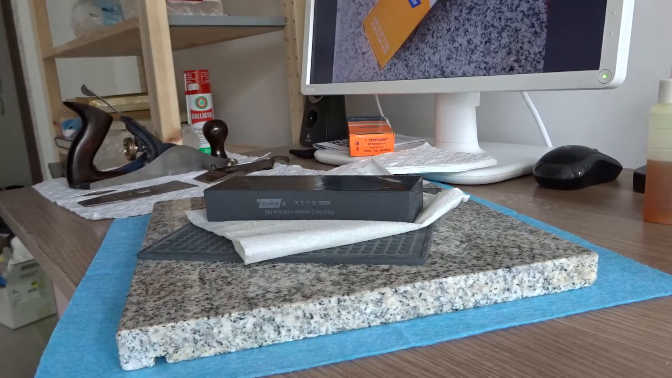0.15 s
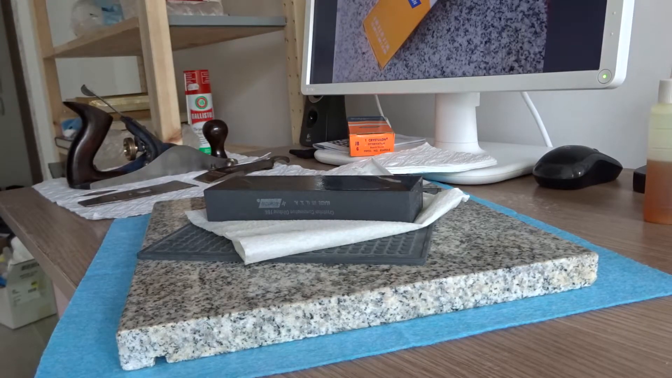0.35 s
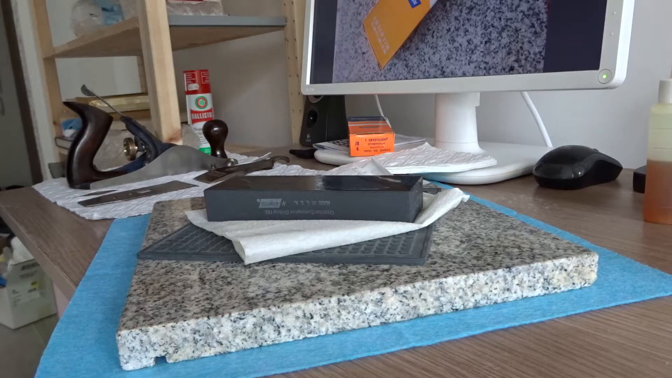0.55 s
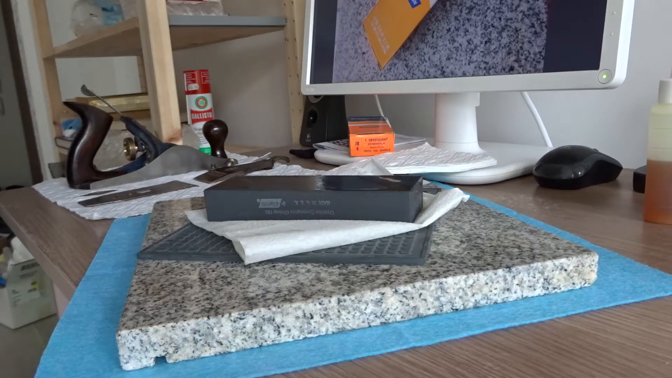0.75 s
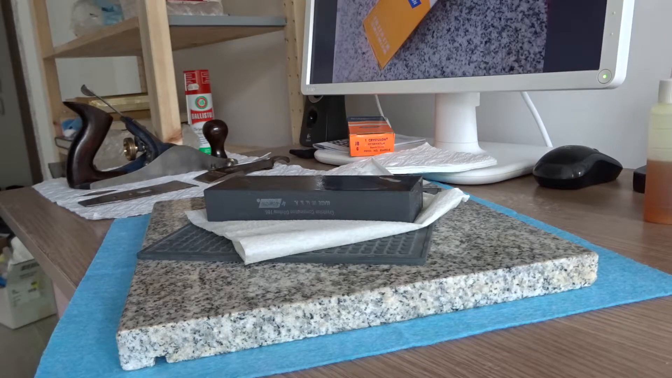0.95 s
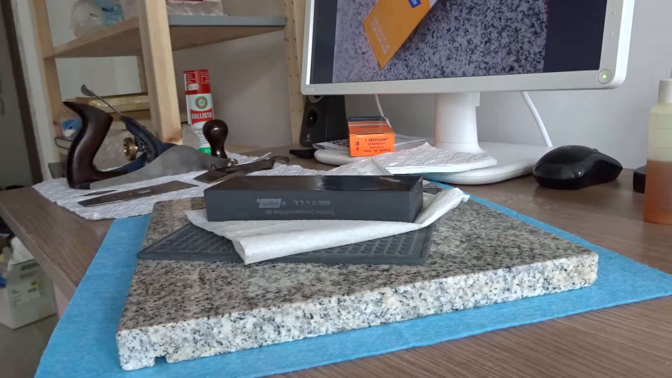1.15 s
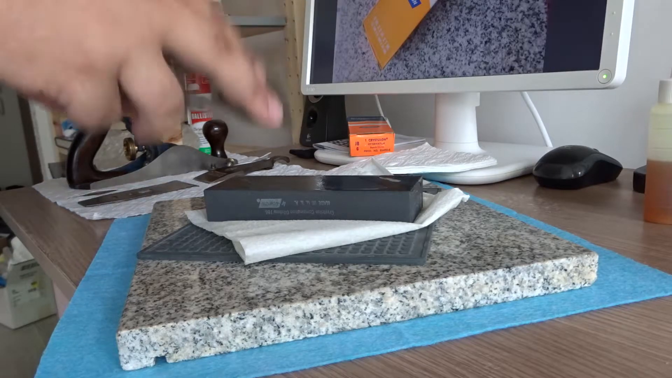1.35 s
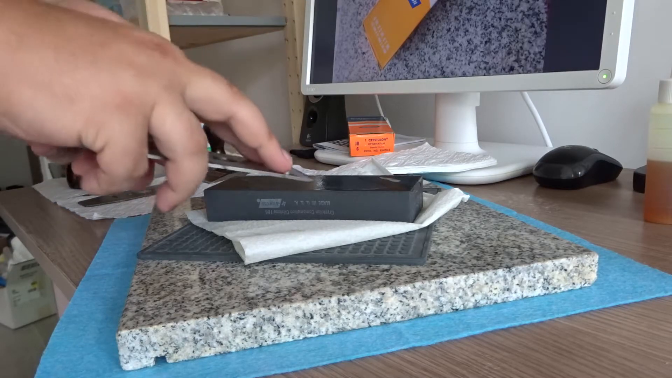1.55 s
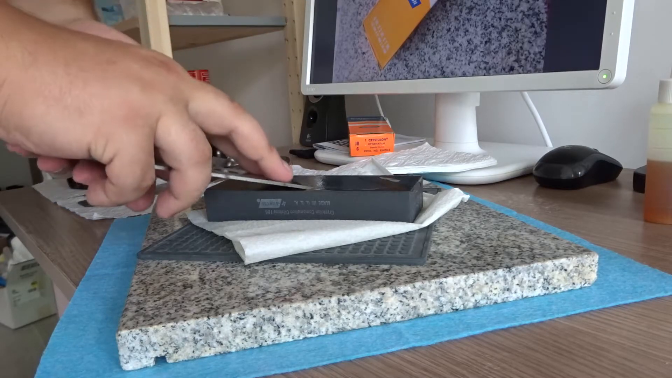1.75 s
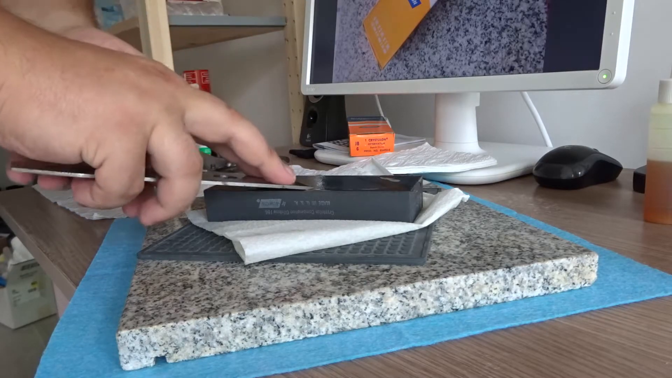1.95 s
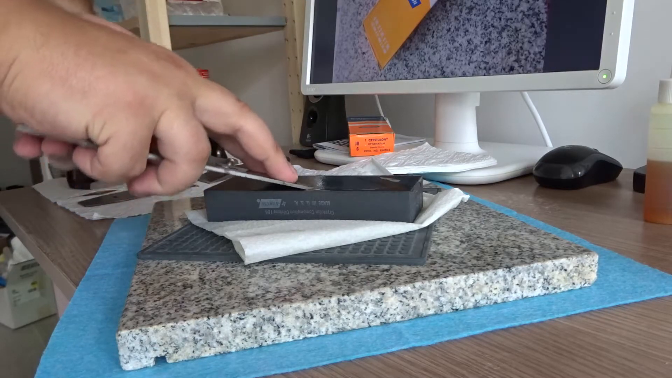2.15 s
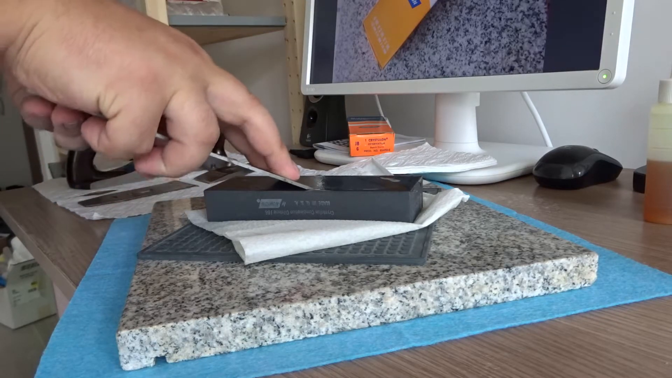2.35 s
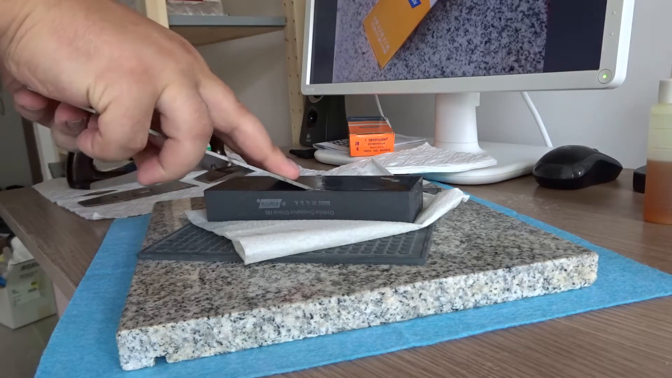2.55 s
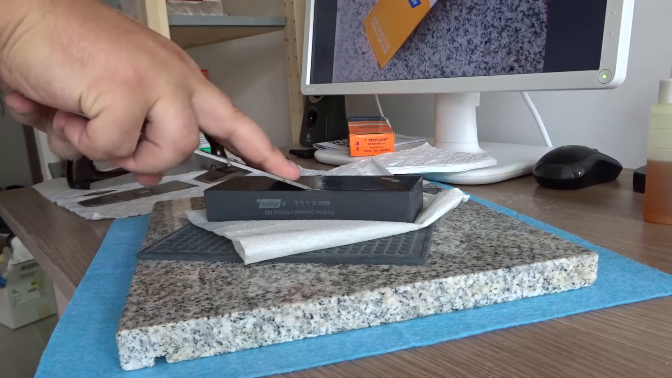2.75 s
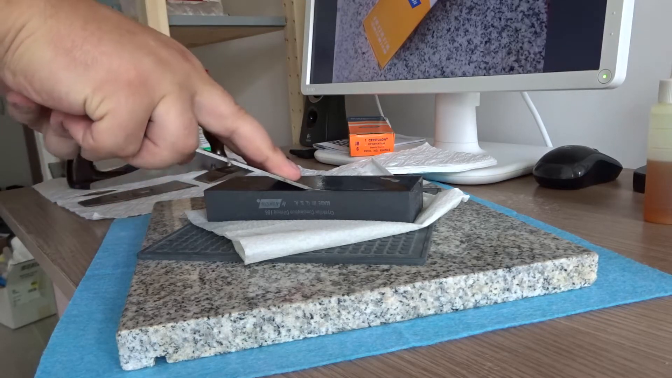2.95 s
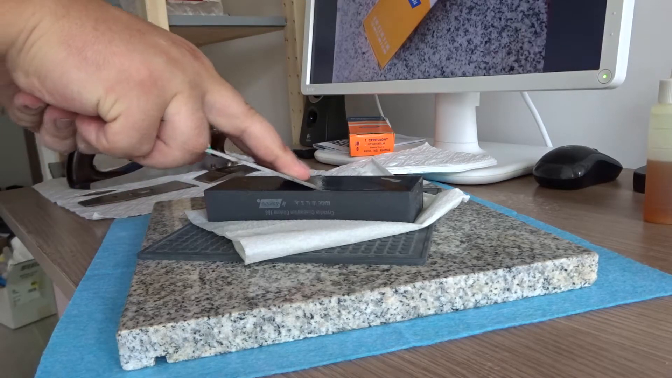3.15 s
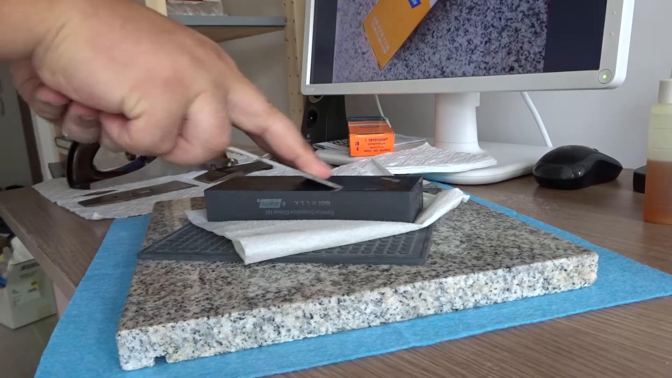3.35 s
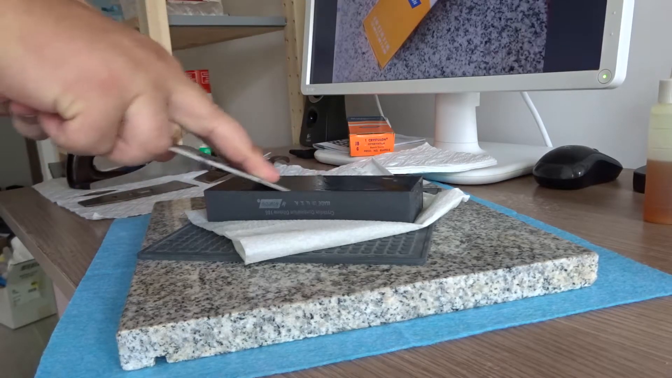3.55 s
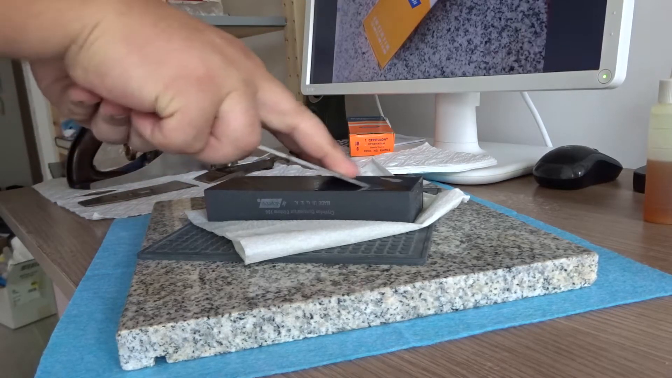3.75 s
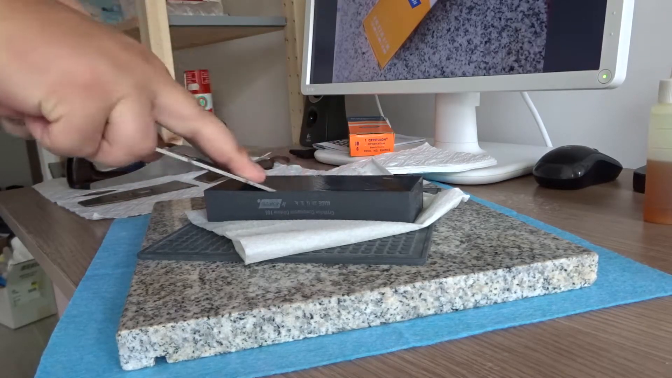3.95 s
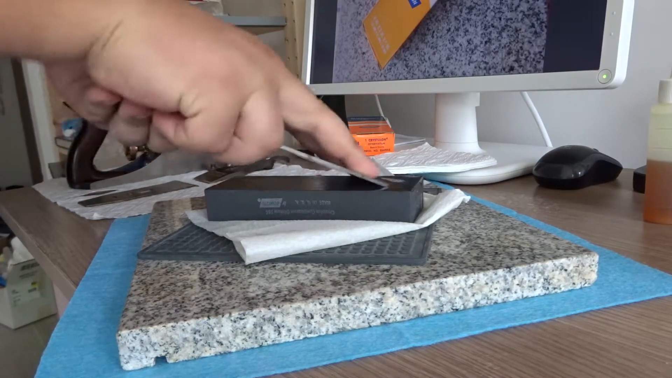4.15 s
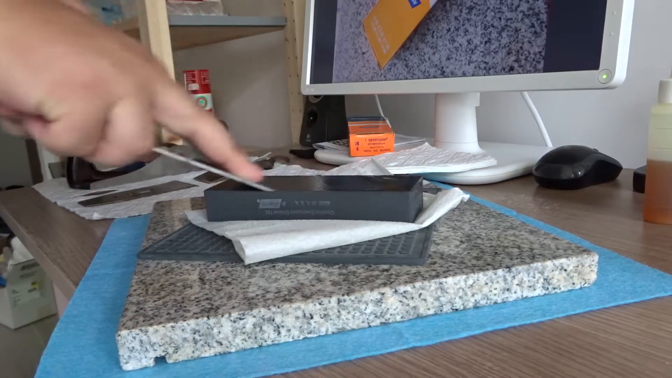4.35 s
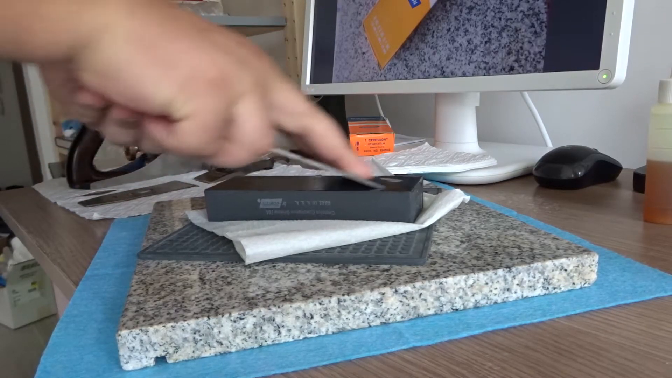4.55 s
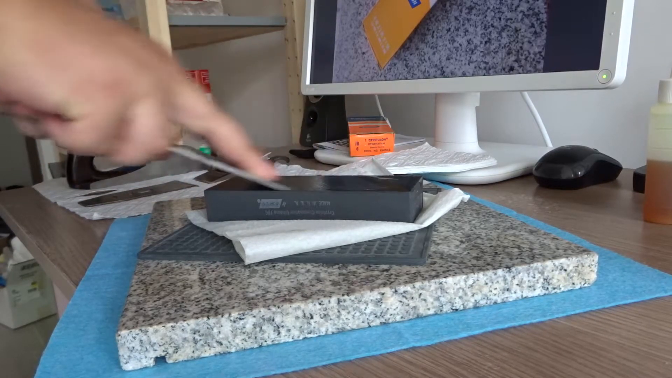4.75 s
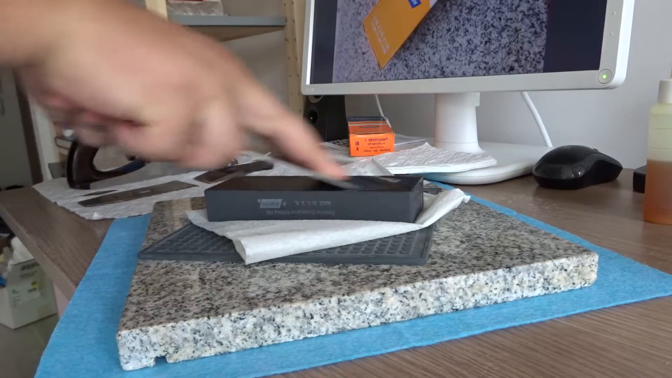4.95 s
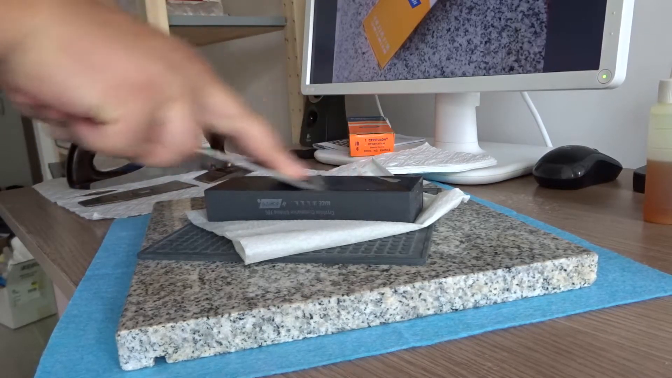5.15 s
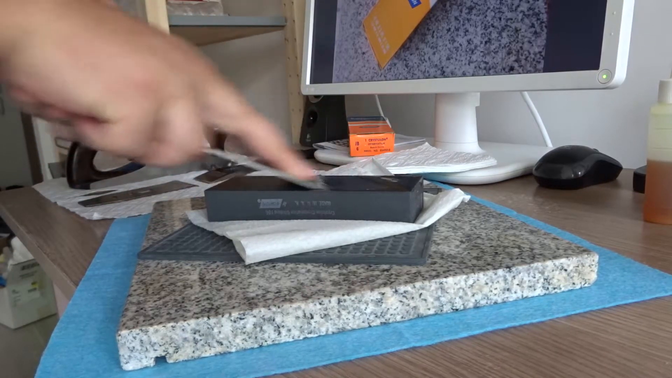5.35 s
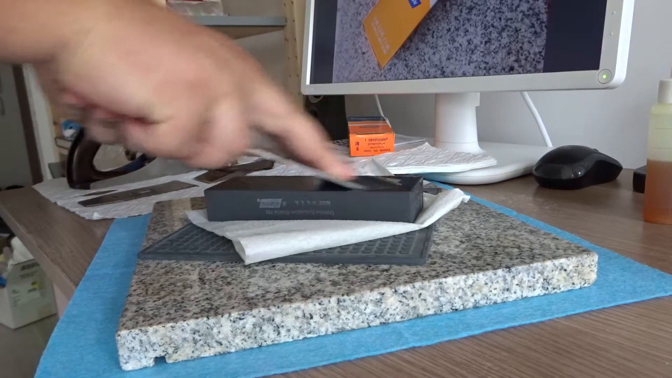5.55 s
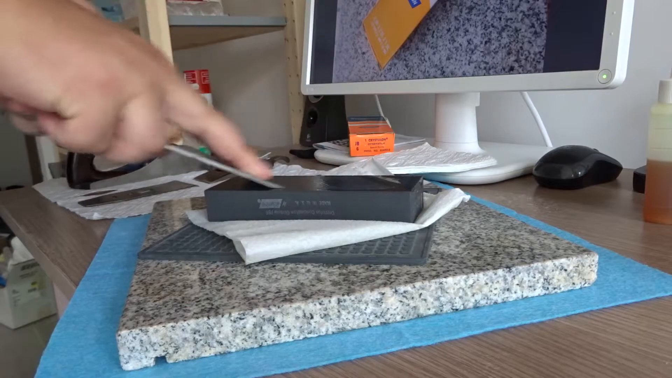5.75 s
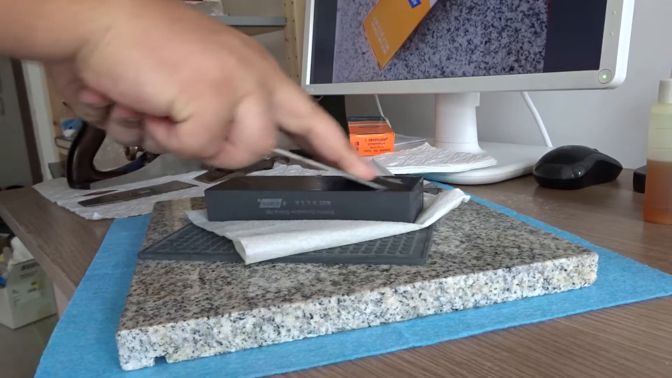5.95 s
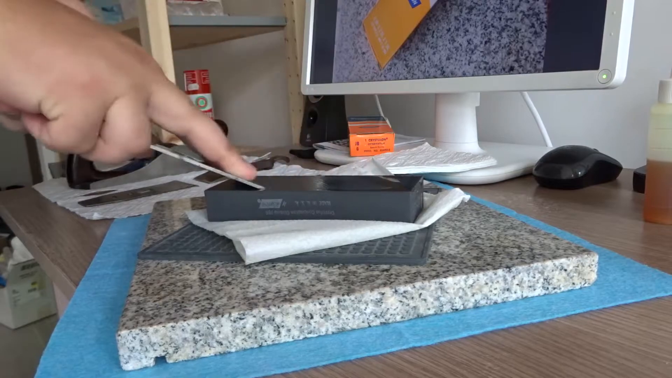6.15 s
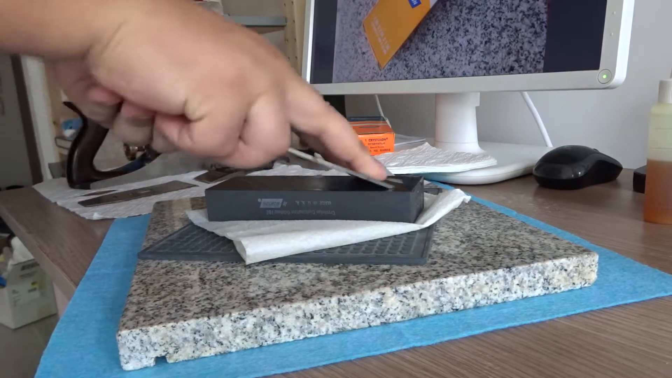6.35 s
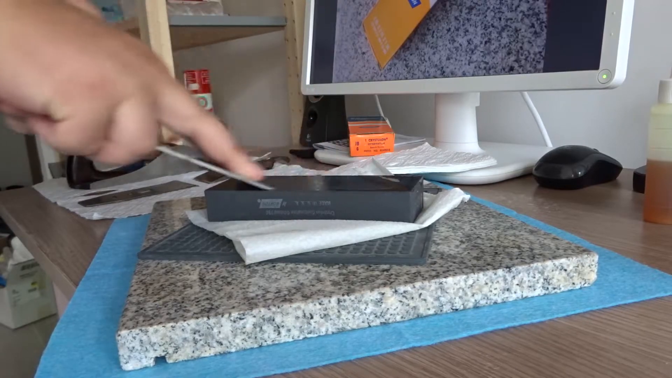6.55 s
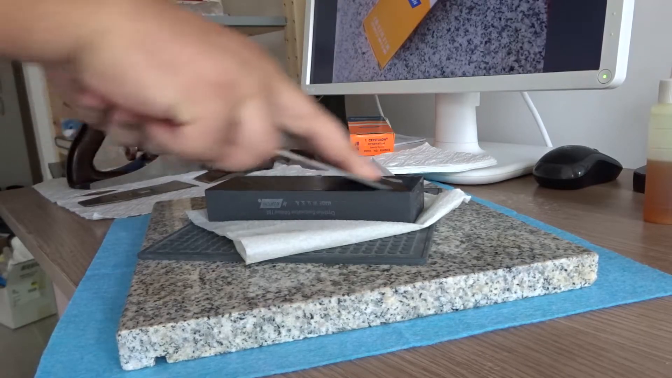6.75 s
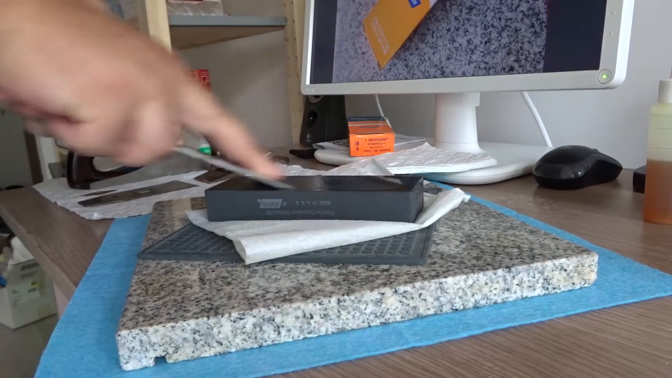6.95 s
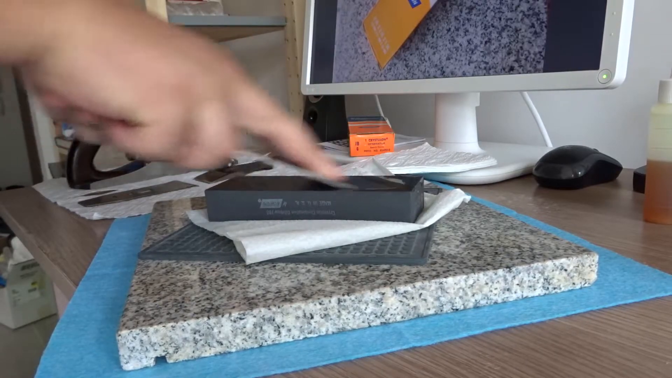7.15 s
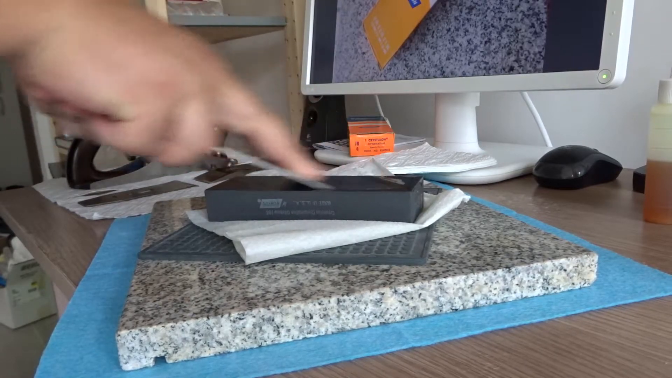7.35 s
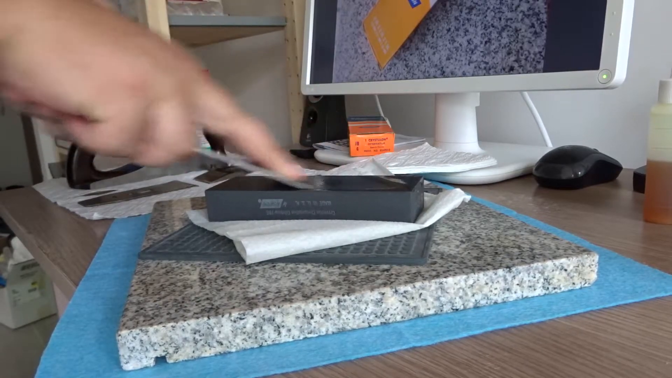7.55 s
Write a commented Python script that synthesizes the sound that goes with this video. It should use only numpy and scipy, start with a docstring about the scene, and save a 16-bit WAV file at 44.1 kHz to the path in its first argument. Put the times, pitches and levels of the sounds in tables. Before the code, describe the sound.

In a small, quiet room a clock ticks faintly over a low hum. Hands bump a desk, and a steel plane blade lands on an oiled whetstone, skids, then slides and clicks as it is settled. Sharpening follows close by: quick, even back-and-forth strokes with a bright, gritty rasp and a slight metallic ring, while the desk rumbles and thumps softly underneath.

```python
"""A small, quiet room: low noise, mains hum and a faint ringing tick about once a second, as of a clock.
Hands bump the desk. Near 1.8 s a plane iron (the blade of a wood plane) lands on an oiled whetstone
and skids, then slides and clicks as it is rocked until its bevel, the sloping edge, lies flat.
From about 3.1 s it is sharpened in quick strokes: grit rasps the steel and makes it bend and ring,
while the hands rumble the desk."""
import sys
import numpy as np
from scipy import signal
from scipy.fft import rfft, irfft, next_fast_len
from scipy.io import wavfile
from scipy.ndimage import map_coordinates

SR = 44100
rng = np.random.default_rng(int(sys.argv[2]) if len(sys.argv) > 2 else 0)


def store_wav(level_fs):
    """Save 16-bit WAV to argv[1]."""
    pcm = np.round(np.clip(np.atleast_2d(level_fs), -1, 1) * 32767)
    wavfile.write(sys.argv[1], SR, pcm.T.astype(np.int16))


N = 334719
TIME = np.arange(N) / SR
PADDED = next_fast_len(N + SR)
FREQS = np.maximum(np.arange(PADDED // 2 + 1) * SR / PADDED, 1)
HONING_START_S = 3.137

# the blade lands flat on the stone and bounces once: t/s, level/dB
LANDING = [(1.758, -34.5), (1.765, -35)]


def from_db(db):
    """Turn decibels into a factor to multiply by."""
    return 10 ** (np.asarray(db) / 20)


def rms_one(x):
    """Scale a signal so that its average power is 1."""
    return x / np.sqrt(np.mean(x ** 2) + 1e-20)


def shape_db(points, resonances=()):
    """A smooth tone colour with a hump for each resonance, in dB at every frequency."""
    hz, db = np.transpose(points)
    humps = sum(lift / (1 + (2 * (FREQS - centre) / width) ** 2) for centre, width, lift in resonances)
    return np.interp(np.log(FREQS), np.log(hz), db) + humps


def filtered(x, gain):
    """Turn each frequency up or down by its own gain."""
    return irfft(rfft(x, PADDED) * gain, PADDED)[..., :N]


def body(x, db):
    """Colour a sound as an object does, ringing only after it is hit (a minimum-phase filter)."""
    cepstrum = irfft(np.log(rms_one(from_db(db))), PADDED)
    cepstrum[1:PADDED // 2] *= 2
    cepstrum[PADDED // 2 + 1:] = 0
    return filtered(x, np.exp(rfft(cepstrum)))


def drift(hz):
    """A random wobble of typical size 1, mostly slower than hz."""
    return rms_one(filtered(rng.standard_normal(N), 1 / (1 + (FREQS / hz) ** 2)))


def decay(t60, start=0):
    """A level that jumps to 1, then falls by 60 dB in t60 seconds."""
    return (TIME >= start) * from_db(-60 * np.clip((TIME - start) / t60, 0, 2))


def swell(start, rise, hold, t60):
    """A level that rises, holds and dies away; times in seconds."""
    fade = from_db(-60 * np.clip((TIME - start - rise - hold) / t60, 0, 2))
    return np.clip((TIME - start) / rise, 0, 1) * fade


def bursts(times, levels_db, t60):
    """Short crunches of noise, one for each contact."""
    return rng.standard_normal(N) * sum(from_db(db) * decay(t60, s) for s, db in zip(times, levels_db))


def grit(per_s, spread_db):
    """Grains of uneven size catch at random moments."""
    sizes = from_db(spread_db * np.minimum(rng.exponential(1, N), 5)) * rng.choice([-1, 1], N)
    chance = np.clip(per_s / SR, 1e-3, 1)
    return rms_one(sizes * (rng.random(N) < chance) / np.sqrt(chance))


def reflections(x, t60, delay):
    """Dense echoes that die away, about as strong in all as the sound itself."""
    tail = rng.standard_normal(N) * decay(t60, delay)
    return signal.fftconvolve(x, tail / np.linalg.norm(tail))[:N]


def diffuse(mid, side):
    """Sound from all around: left and right are alike in the bass and differ higher up."""
    # stereo width: f/Hz, side level/dB
    width = [(100, -25), (250, -18), (550, -6.5), (1200, -2), (5000, 0), (10000, 1.5), (13000, -7.5)]
    return mid + filtered(side, from_db(shape_db(width))) * np.array([[1], [-1]])


def room(x, wet_db, side_db):
    """Echoes from shelves and walls, different on the left and right."""
    mid, side = [reflections(x, t60=0.34, delay=0.0028) for _ in range(2)]
    return x + from_db(wet_db) * diffuse(mid, from_db(side_db) * side)


def background(air_db=-48.5, waver=0.3):
    """Low room noise with wavering mains hum and a thin electronic whine."""
    # colour of the room noise: f/Hz, level/dB
    air_colour = [(25, -35), (60, -3.5), (110, -6), (180, -2), (250, -1), (400, -9), (620, -9),
                  (850, -14.5), (1150, -22.5), (2700, -26.5), (4400, -32), (5500, -39), (15500, -44)]
    # hum and whine: f/Hz, level/dB
    tones = [(49, -79), (123, -59), (9577, -73)]
    air = diffuse(*body(rng.standard_normal((2, N)), shape_db(air_colour)))
    air *= from_db(air_db + drift(hz=4.2))
    hum = 0
    for hz, db in tones:
        tone = np.sqrt(2) * np.sin(2 * np.pi * hz * TIME + drift(hz=2.8))
        hum += from_db(db) * tone * (1 + waver * drift(hz=6.5))
    return air + hum


def clock(wash_db=-6.5, wash_t60=1.4, swell_db=9.5, wire_db=-5.0, flutter=0.97, click_db=-1.0):
    """Each tick sets ringing a few clear tones and a wash of many weak ones."""
    # ticks: t/s, level/dB
    ticks = [(-.38, -35), (0.687, -44.5), (1.804, -44), (2.874, -46.5)]
    # tones of the clock's wire: f/Hz, level/dB, t60/s
    wire = [(2536, -11, 1.5), (3499, 1.5, 1.15), (4371, 1, 1.5), (7009, -12, 1.2), (7542, -10, 1.2),
            (8032, -14, .9), (10860, -10, .7), (11480, -16, .55), (12710, 0, .55), (14800, -13, .4)]
    # colour of the wash: f/Hz, level/dB
    colour = [(1500, -1), (2500, 10.5), (3000, 3), (5000, 9), (5800, 1), (7200, 5.5), (8800, -4),
              (11000, 3.5), (14000, -12), (15500, 5.5)]
    # where its tones bunch up: f/Hz, width/Hz, lift/dB
    clusters = [(3574, 96, 21.8), (4100, 110, 4.9), (12700, 350, 11)]
    level = 0
    for s, db in ticks:
        spread = np.clip((TIME - s) / 0.14, 0, 1)   # the ringing spreads through the case
        level += from_db(db + wash_db + swell_db * spread) * decay(wash_t60, s)
        level += from_db(db + click_db) * decay(0.088, s)   # the blow itself
    shimmer = rng.standard_normal(N)
    shimmer = 0.54 * (shimmer + reflections(shimmer, t60=0.026, delay=0.00082))
    sound = level * body(shimmer, shape_db(colour, clusters))
    for hz, tone_db, t60 in wire:
        ringing = sum(from_db(db + tone_db + wire_db) * decay(t60, s) for s, db in ticks)
        beating = 1 + flutter * (drift(hz=23) + 1j * drift(hz=110))   # close tones flutter together
        sound += ringing * np.real(beating * np.exp(2j * np.pi * hz * TIME))
    return sound


def desk(light_db=-12.0, thump_db=-8.0, rumble_db=-47.5, waver_db=1.8, lean_s=0.08):
    """Hands bump the desk lightly; once they lean on the stone it thumps deeper and rumbles."""
    # thumps of the hands: t/s, level/dB
    thumps = [(0.408, -49), (1.583, -22.5), (1.653, -24), (1.732, -23), (2.427, -27), (2.77, -27),
              (3.281, -26), (3.551, -21), (3.707, -22.5), (5.999, -21), (6.164, -20), (6.391, -23),
              (7.551, -24.5)]
    # the desk's resonances: f/Hz, width/Hz, lift/dB
    resonances = [(128.8, 12, 16), (190.5, 52, 19), (248, 25, 12.5)]
    s, db = np.transpose(thumps)
    leaning = s > HONING_START_S
    working = np.clip((TIME - HONING_START_S) / lean_s, 0, 1)
    rumble = working * from_db(rumble_db + waver_db * drift(hz=3.9)) * rng.standard_normal(N)
    heavy = rumble + bursts(s[leaning], db[leaning] + thump_db, t60=0.084)
    light = bursts(s[~leaning], db[~leaning] + light_db, t60=0.12)
    # colours of heavy and light shaking: f/Hz, level/dB
    deep = [(30, -10), (80, -0.5), (250, 1), (450, -6.0), (1200, -20), (5000, -85)]
    higher = [(60, -45), (150, -5), (200, 0.5), (270, 4), (350, -22.5), (1200, -28), (5000, -72)]
    return body(heavy, shape_db(deep, resonances)) + body(light, shape_db(higher))


def knock(knock_db=-19):
    """The landing blade makes the stone ring briefly."""
    # the stone's tones: f/Hz, level/dB, t60/s
    tones = [(1180, -14, 0.26), (1740, -18, .12), (2090, -15, .12), (3250, 12, 0.031), (4170, 5, 0.061),
             (5350, 1, 0.044)]
    ring = sum(from_db(db) * decay(t60) * np.sin(2 * np.pi * hz * TIME) for hz, db, t60 in tones)
    s, db = np.transpose(LANDING)
    return signal.fftconvolve(bursts(s, db + knock_db, t60=0.0073), ring)[:N]


def skid(skid_db=-45, scuff_db=-3.0):
    """The loose blade scuffs as it lands, then skids over the grit, ringing."""
    # colour of the skid: f/Hz, level/dB
    colour = [(500, -20), (1100, -1.5), (2500, -2), (5200, 7.5), (6300, 2.5), (8500, 2), (10000, -4),
              (15500, -6)]
    s, db = np.transpose(LANDING)
    level = from_db(skid_db) * swell(s[0], rise=0.036, hold=0.12, t60=0.98)
    scrape = level * grit(20000, spread_db=1.5) + bursts(s, db + scuff_db, t60=0.045)
    ringing = 0.7 * (scrape + reflections(scrape, t60=0.024, delay=0.00083))
    return body(ringing, shape_db(colour))


def loose_blade(force):
    """The loosely held steel rings brightly when tapped or rubbed."""
    # its colour: f/Hz, level/dB
    colour = [(600, -14), (2000, -9), (3500, -3), (7000, 3.5), (11000, 7.5), (15500, 1.5)]
    # its resonances: f/Hz, width/Hz, lift/dB
    resonances = [(2780, 300, 18), (4060, 360, 15), (5740, 270, 12), (6350, 230, 9.1), (7800, 150, 2.8)]
    return body(force, shape_db(colour, resonances))


def clicks(touch_db=-1.0, crack_db=-4.0):
    """The blade clicks on the stone as it lands, as it rocks onto its bevel, and as its edge catches on the
    first push."""
    # the bevel touches down, then the edge catches as the first push begins (3.367 s): t/s, level/dB
    touches = [(2.138, -33), (2.165, -27), (2.405, -31), (2.4276, -29.5), (2.442, -26), (2.721, -32.5),
               (2.774, -25), (3.367, -23)]
    s, db = np.transpose(LANDING + touches)
    return loose_blade(bursts(s, db + touch_db, t60=0.021) + bursts(s, db + crack_db, t60=0.0048))


def slides(patchy_db=2.5):
    """The blade slips lightly over the grit while its bevel is laid flat."""
    # slips: t/s, rise/s, level/dB
    slips = [(2.08, 0.027, -49.5), (2.17, .09, -47), (2.38, 0.039, -49.5), (2.715, 0.018, -48.5),
             (2.75, .04, -60), (2.85, 0.15, -54.5)]
    level = sum(from_db(db) * swell(s, rise, hold=0, t60=0.94) for s, rise, db in slips)
    return loose_blade(level * from_db(patchy_db * drift(hz=68)) * grit(12000, spread_db=4.0))


def stroke_starts(count=24, cycle_s=0.429, slowing_s=0.00095, push_share=0.512):
    """Pulls and pushes take turns in a rhythm that slows very slightly; a cycle is one of each."""
    k = np.arange(count)
    lengths = (cycle_s + slowing_s * k) * np.where(k % 2, push_share, 1 - push_share)
    return HONING_START_S + np.cumsum(lengths) - lengths


def hand(warm_up_s=0.9, cold_db=-2, trial_db=-7, trial_rise_s=0.18, trial_end_s=3.365):
    """After a light trial stroke the hand finds its swing: a pull eases in, a push bites at once."""
    # pull, then push: sharpness of start, sharpness of stop, level/dB, swell along the stroke/dB
    directions = [(3.0, 3.2, -19.5, -.8), (10.0, 3.0, -20, 1)]
    starts = stroke_starts()
    strokes_done = np.interp(TIME, starts, np.arange(len(starts)))
    stroke, part = np.divmod(strokes_done, 1)
    attack, brake, level_db, swell_db = np.array(directions)[stroke.astype(int) % 2].T
    cold = np.exp(-np.maximum(TIME - HONING_START_S, 0) / warm_up_s)   # 1 at first, 0 in full swing
    swing = np.tanh(attack * part) * np.tanh(brake * (1 - part))
    turning_speed = 0.063 * cold + 0.31 * (1 - cold)
    speed = np.hypot(swing, turning_speed)
    contact = np.clip((TIME - HONING_START_S) / trial_rise_s + 0.5, 1e-6, 1)
    press_db = level_db + swell_db * (part - 0.5) + cold_db * cold + trial_db * (TIME < trial_end_s)
    return strokes_done, speed, press_db + 20 * np.log10(contact), cold


def bent(x, strokes_done, bend):
    """Pitch swings by the fraction bend as the blade travels along the stone and back."""
    lag = np.cumsum(bend * np.cos(np.pi * strokes_done) * (strokes_done > 0))
    return map_coordinates(x, [np.arange(N) - lag], order=5)


def honing(grains_per_s=20000, chatter_db=0.52, ring_db=-6.0, roving_hz=5490, roving_width_hz=510):
    """Grit rasps the steel: a faster blade catches more grains and sounds louder and brighter."""
    # the treble needs speed: f/Hz, power of speed that the strength follows
    speed_law = [(1500, 0.32), (4000, 0.36), (9500, 0.6), (13000, 1)]
    # colour of the rasp: f/Hz, level/dB
    colour = [(450, -27.5), (750, -14.5), (1000, -22), (1850, -14.5), (2300, -4), (3100, -6), (4500, -1.5),
              (6100, -0.1), (8500, 0.5), (12000, -0.23), (14000, -3), (15600, -3.5)]
    # resonances of the blade held on the stone: f/Hz, width/Hz, lift/dB
    resonances = [(1474, 280, 13), (1623, 46, 7.5), (2467, 55, 7.5), (2560, 95, 7), (2715, 35, 8.5),
                  (3625, 225, 6.5), (3860, 230, 7.5), (4037, 59, 7.5), (4840, 440, 1), (4980, 130, 5.5),
                  (5450, 250, 7.5), (5445, 140, 2.5), (7500, 61, 5), (8960, 450, 3.5), (10730, 160, 2.5),
                  (12800, 700, 4), (13090, 610, 6), (15100, 440, 6)]
    strokes_done, speed, press_db, cold = hand()
    grains = grit(grains_per_s * speed, spread_db=2.0) * from_db(press_db + chatter_db * drift(hz=92))
    hz, powers = np.transpose(speed_law)
    bands = [filtered(grains, np.interp(FREQS, hz, zone)) for zone in np.eye(len(hz))]
    force = sum(band * speed ** power for band, power in zip(bands, powers))
    bass = filtered(force, 1 / (1 + (FREQS / 1410) ** 4))
    force += from_db(-1) * cold * bass   # the first strokes rasp lower
    rasp = body(force, shape_db(colour, resonances))
    # close echoes around the blade add many narrow resonances
    ring_gain = from_db(ring_db + shape_db([(2000, 3.5), (4500, -9.0), (7000, 0.0)]))
    rasp += filtered(reflections(rasp, t60=0.043, delay=0.001), ring_gain)
    # all resonances shift as the blade travels; the roving one depends most on where the edge rests
    share = np.exp(-((FREQS - roving_hz) / roving_width_hz) ** 2)
    roving = bent(filtered(rasp, share), strokes_done, bend=0.01996)
    others = bent(filtered(rasp, np.sqrt(1 - share ** 2)), strokes_done, bend=0.00694)
    return others + roving


def scene():
    """The stone sits straight ahead, the clock farther off."""
    handling = room(slides() + skid() + clicks() + knock() + desk(), wet_db=-5.5, side_db=-11.5)
    ticking = room(clock(), wet_db=-7.0, side_db=-7.5)
    strokes = room(honing(), wet_db=-11.5, side_db=-4.8)
    return background() + ticking + handling + strokes


def record(dry, cutoff_hz=15720):
    """The highest treble is cut off steeply."""
    return signal.sosfilt(signal.ellip(12, 0.1, 80, cutoff_hz, fs=SR, output="sos"), dry)


dry = scene()
out = record(dry)
store_wav(out)
```